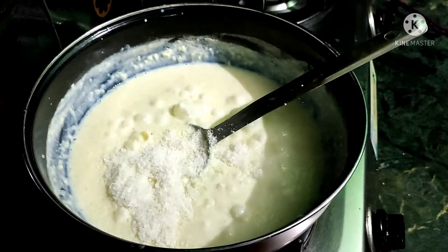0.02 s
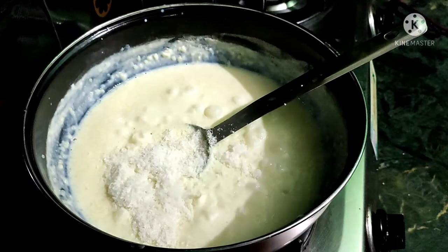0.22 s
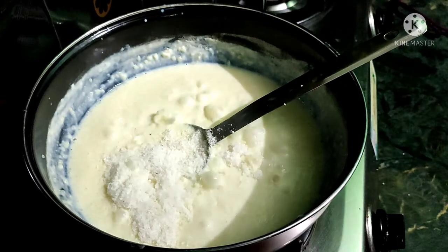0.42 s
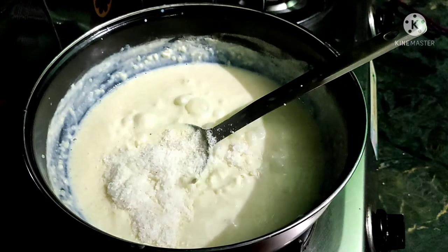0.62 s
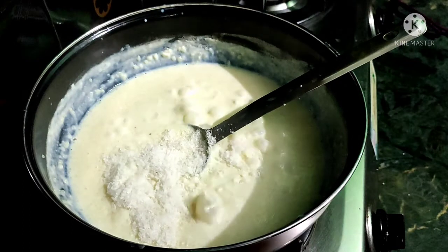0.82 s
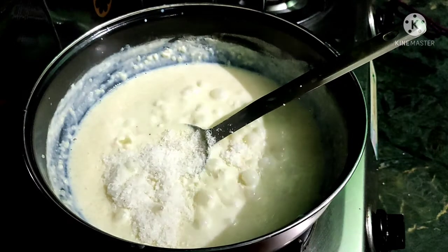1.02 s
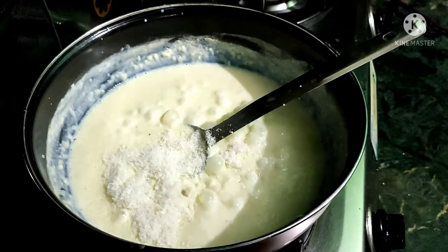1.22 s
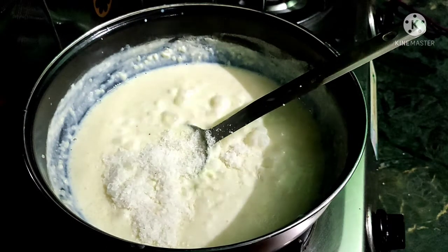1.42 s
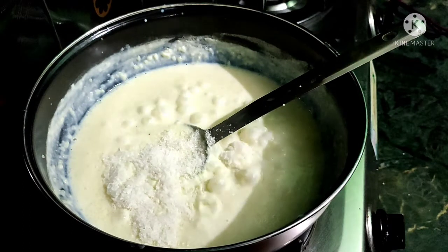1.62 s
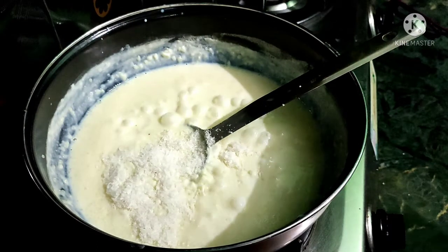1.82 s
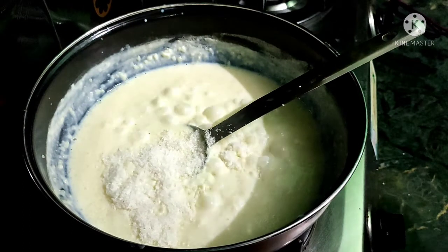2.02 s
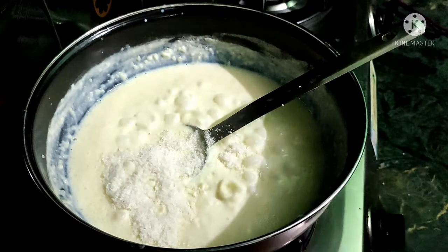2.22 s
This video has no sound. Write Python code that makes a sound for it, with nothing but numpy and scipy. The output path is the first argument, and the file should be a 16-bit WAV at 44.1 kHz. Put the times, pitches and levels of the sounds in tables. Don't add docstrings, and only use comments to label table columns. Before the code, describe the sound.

Steady thick bubbling in a metal pan, heard very close in stereo: dull thumps, wet pops and fine fizz over faint flame hush. Near the start something hard is tapped, rings briefly and fades in the kitchen.

```python
import sys
import numpy as np
from scipy import signal
from scipy.io import wavfile
from scipy.ndimage import uniform_filter1d

SR = 44100
rng = np.random.default_rng(int(sys.argv[2]) if len(sys.argv) > 2 else 0)


def how_loud(loudness_db):
    steps = np.asarray(loudness_db, float) / 20
    return 10 ** steps


def generate_wav(sig):
    pcm = np.round(np.clip(np.atleast_2d(sig).T, -1, 1) * 32767).astype(np.int16)
    wavfile.write(sys.argv[1], SR, pcm)


N = 101429
T = np.arange(N) / SR
SIDES = np.array([[.5], [-.5]])

# [t/s, peak level/dB, length/s]
GULPS = [(0.054, -40.5, 0.036), (0.165, -41, 0.16), (0.395, -40.5, 0.046), (0.558, -55, 0.19),
         (0.62, -32, 0.012), (0.68, -50, 0.019), (0.751, -39.5, 0.034), (0.796, -53, 0.022),
         (0.872, -41.5, 0.015), (0.947, -39.5, 0.057), (1.067, -37.5, 0.026), (1.132, -41.5, 0.0092),
         (1.197, -42, 0.048), (1.297, -47, 0.031), (1.386, -45, 0.079), (1.452, -48.5, 0.033),
         (1.615, -33, 0.017), (1.721, -46, 0.046), (1.748, -44.5, 0.012), (1.845, -47, 0.021),
         (1.905, -38.5, 0.042), (2.011, -46.5, 0.1), (2.1, -39.5, 0.043), (2.228, -43, 0.015)]
# [t/s, peak level/dB, length/s]
HEAVES = [(0.053, -37, 0.028), (0.156, -31.5, 0.098), (0.22, -39, 0.025), (0.24, -39.5, 0.079),
          (0.325, -52, 0.069), (0.392, -41, 0.079), (0.444, -35, 0.019), (0.463, -49, 0.029),
          (0.519, -42, 0.06), (0.63, -41, 0.039), (0.684, -39, 0.027), (0.752, -34.5, 0.029),
          (0.815, -34.5, 0.074), (0.87, -41.5, 0.044), (0.968, -31.5, 0.023), (1.013, -43, 0.051),
          (1.083, -36.5, 0.054), (1.206, -44, 0.078), (1.32, -41, 0.027), (1.394, -38, 0.054),
          (1.526, -43, 0.06), (1.569, -47.5, 0.035), (1.636, -36.5, 0.045), (1.747, -41.5, 0.086),
          (1.844, -44, 0.042), (1.913, -45, 0.097), (2.014, -41, 0.017), (2.05, -38.5, 0.068),
          (2.102, -43, 0.044), (2.128, -37, 0.054), (2.21, -52, 0.035), (2.229, -42, 0.018)]
# [f/Hz, level/dB, t60/s]
PAN_MODES = [(98, -8.5, 0.42), (204.7, -4, 0.22), (265.7, -12, 0.3), (378, -8.5, 0.05), (485, -11, 0.051),
             (604, -9.5, 0.19), (735.6, -14, 0.11), (822, -14, 0.079), (1177, -12, 0.17), (1238, -24, 0.3)]
# [f/Hz, density/dB per Hz]
SEETHE_SPECTRUM = [(35, -56), (60, -54), (92, -25), (204, -6), (678, -8), (1180, -6.5), (5000, -36),
                   (6500, -100), (11000, -120)]
# [f/Hz, density/dB per Hz]
HUSH_SPECTRUM = [(56, -48), (95, -19.5), (207, -4), (609, -14.5), (1030, -30.5), (1170, -19.5), (2510, -20),
                 (5000, -27.5), (12700, -34), (14800, 16)]
# [t/s, level/dB]
STEAM_COURSE = [
    (0.0, -74),
    (1.86, -73.5),
    (2.02, -67.5),
    (2.19, -72.5),
    (2.3, -68.5),
]
# [t/s, level/dB]
DRAUGHT_COURSE = [
    (0.0, -54),
    (0.21, -55.5),
    (0.6, -48.5),
    (1.0, -56),
    (2.3, -56),
]
# [t/s, peak level/dB, f/Hz]
SURFACE_POPS = [(0.63, -38.5, 1135), (0.63, -43.5, 460), (0.648, -43.5, 600), (0.768, -41, 638),
                (0.795, -50, 605), (1.312, -44, 616), (1.69, -45, 616), (0.8, -43.5, 1160),
                (0.887, -34, 1213), (0.981, -50, 1215), (1.202, -55, 1090), (1.228, -47.5, 1270),
                (1.61, -47.5, 1240), (1.69, -46, 1240), (1.904, -46, 1280), (1.929, -45, 1190),
                (2.095, -39.5, 1300), (2.125, -44, 870), (1.132, -30, 1370), (1.392, -46.5, 1280),
                (1.487, -41, 900), (1.636, -43, 1250), (1.872, -37.5, 1260), (2.062, -43, 920),
                (2.156, -35, 1216), (2.249, -35.5, 1354),
                (0.111, -41, 1770), (0.66, -55, 1650), (1.023, -43, 1694), (1.278, -48, 3300),
              (1.312, -54, 3330), (1.334, -52, 1960), (1.694, -65, 3400), (1.9045, -40.5, 2720),
              (2.064, -42, 1620), (0.6965, -40.5, 1630), (0.7618, -43, 2000), (0.8062, -39.5, 1790),
              (0.9554, -35, 1734), (0.981, -41.5, 1920), (1.041, -38.5, 2050), (1.0547, -46, 2700),
              (1.2292, -40, 1840), (1.41, -44, 2240), (1.4432, -43.5, 2050), (1.5004, -44, 2760),
              (1.5778, -49, 1840), (1.6082, -41.5, 2000), (1.7856, -42.5, 2110), (1.9045, -39.5, 1870),
              (1.9515, -42, 2130), (2.022, -39.5, 1660), (2.0957, -38, 2400), (2.2476, -42.5, 1700)]
# [f/Hz, level/dB, t60/s]
TAP_MODES = [(606, -11, .25), (1335, -7.5, .3), (1413, -2.5, .3), (1471, -8, .3), (1537, -8, .4),
             (1895, -15, .45), (2008, -11, .55), (2052, -12, .55), (2370, -10, .35), (2736, -13, .4),
             (3096, -13, .35), (3444, -13, .35), (3553, -13, .3)]
# [f/Hz, level/dB, t60/s]
TAP_CONTACT = [(1440, -3, .035), (2330, -9, .05), (2830, -11, .06), (3800, -12, .04), (7650, -24, .05),
               (12300, -29, .07)]
# [f/Hz, density/dB per Hz]
TAP_SPECTRUM = [(88, -36), (150, -8.5), (1060, -13), (1370, -5), (4490, -18.5), (12400, -50.5),
                (14800, -54)]
# [f/Hz, left-right level/dB]
TAP_LEAN = [(60, 0), (370, -0.5), (2310, -0.5), (14300, -2)]
# [f/Hz, t60/s]
TAP_DECAY = [(150, 0.063), (400, 0.34), (1040, 0.41), (2760, 0.33), (7280, 0.21)]
# [t/s, peak level/dB, decay/s]
SPITS = [(0.5168, -48, 0.029), (0.564, -41, 0.02), (0.675, -53, 0.046), (0.863, -50, 0.025),
         (0.933, -48.5, 0.07), (1.026, -51.5, 0.031), (1.411, -49, 0.019), (1.7355, -50.5, 0.052),
         (1.0776, -48, 0.059), (1.197, -45, 0.017), (1.281, -47.5, 0.085), (1.4516, -43, 0.049),
         (1.819, -47.5, 0.019), (1.859, -50, 0.054), (1.9041, -52.5, 0.084), (1.964, -49.5, 0.075),
         (2.021, -51.5, 0.081), (2.1, -49.5, 0.073), (2.1233, -49.5, 0.028), (2.243, -44, 0.023)]
# [f/Hz, density/dB per Hz]
SPIT_SPECTRUM = [(1470, -17), (2500, -11.5), (3390, 1), (4330, -6.5), (7340, -12), (14800, -28)]
# [t/s, peak level/dB, f/Hz of the ring]
SNAPS = [
    (0.573, -46.5, 7600),
    (0.9322, -40.5, 7040),
    (1.968, -46, 6050),
    (1.0817, -40, 6730),
    (1.1994, -44, 6850),
    (1.8166, -38, 7540),
    (2.124, -39.5, 7720),
]
# [f/Hz, correlation]
LIKENESS = [(60, .97), (240, .98), (900, .6), (3600, .35), (14000, .3)]
# [f/Hz, left-right level/dB]
LEAN = [(60, 0), (240, 3), (930, 3.5), (3640, 0), (14300, -1.5)]

GULP_DB, PAN_REST_DB, GULP_RELEASE_S = -12, -59.5, 0.017
HEAVE_DB, HEAVE_REST_DB, HEAVE_RELEASE_S = -7.5, -52.5, 0.0092
DEEP_BELOW_HZ = 320
TAP_S, TAP_DB, TAP_CRACK_DB, TAP_WASH_DB, TAP_ROOM_DB = .2132, -22, -29.5, -26.5, -27
TAP_LAG = 2.5
DAMPED_S, DAMPED_DB = .038, -11
CHIME_HZ, CHIME_DB, CHIME_T60_S, CHIME_SWELL_S = 4505, -36, .5, .009
CHIME_LEAN_DB, CHIME_DAMPED_DB = -12, -12
LATE_DB, LATE_STRETCH = -17, 3
KITCHEN_T60_S, KITCHEN_DB, WALL_CUT_HZ = 0.48, -13.5, 4000


def rms_one(x):
    return x / np.sqrt(np.mean(x ** 2) + 1e-20)


def at_hz(points, hz):
    return np.interp(np.log(hz), np.log(np.array(points)[:, 0]), np.array(points)[:, 1])


def filtered(x, order, cut_hz, kind):
    return signal.sosfilt(signal.butter(order, cut_hz, kind, fs=SR, output="sos"), x)


def drift(rate):
    r = np.exp(-80 * np.pi * rate / SR)
    noise = rng.standard_normal(N // 40 + 2002)
    slow = signal.lfilter([1], [1, -2 * r, r * r], noise)[2000:]
    return np.interp(np.arange(N) / 40, np.arange(len(slow)), rms_one(slow))


def ring(clicks, hz, t60):
    r, w = how_loud(-60 / (t60 * SR)), 2 * np.pi * hz / SR
    return signal.lfilter([0, np.sin(w)], [1, -2 * r * np.cos(w), r * r], clicks + 1e-18)


def grains(rate, spread_db):
    sizes = how_loud(spread_db * np.minimum(rng.exponential(1, N), 5)) * rng.choice([-1, 1], N)
    return sizes * (rng.random(N) < rate / SR)


def alike_ports(hz):
    return at_hz(LIKENESS, hz)


def bands(spectrum, shape, alike, lean):
    out, power, edges = 0, 0, 56 * 2 ** np.arange(0, 8.2, 1 / 3)
    white = rng.standard_normal((2, 2, N))
    for k, (low, high) in enumerate(zip(edges, edges[1:])):
        hz = np.sqrt(low * high)
        if not spectrum[0][0] <= hz <= spectrum[-1][0]:
            continue
        mid, side = filtered(white[k % 2], 2, [low, high], "band")
        c = np.clip(alike(hz), 0, 1)
        gain = how_loud(at_hz(spectrum, hz))
        power += gain ** 2 * np.mean(mid ** 2)
        pair = np.sqrt(1 + c) * mid + np.sqrt(1 - c) * side * 2 * SIDES
        out = out + gain * shape(hz) * how_loud(SIDES * at_hz(lean, hz)) * pair
    return out / np.sqrt(2 * power)


def vigour(rows, gain_db, rest_db, release):
    out = np.full(N, how_loud(rest_db))
    for s, db, hold in rows:
        up = np.clip((T - s) / 0.0028 + .5, 0, 1)
        out += how_loud(db + gain_db) * up * np.exp(-np.maximum(T - s - hold, 0) / release)
    return out


def pan(boil, deep):
    thumps = rms_one(signal.lfilter([.2], [1, -.8], grains(900, spread_db=1.5)))
    out = np.zeros((2, N))
    for hz, db, t60 in PAN_MODES:
        t60 = min(t60, .17)
        drive = thumps * (1 if hz < DEEP_BELOW_HZ else boil)
        signs = rng.choice([-1, 1], N // 32 + 1).repeat(32)[:N]
        hit = ring(drive * signs, hz, t60) / np.sqrt(t60 * SR / 14)
        if hz < DEEP_BELOW_HZ:
            even = hit / np.sqrt(uniform_filter1d(hit ** 2, SR // 25) + .05)
            hit = even * (deep.mean() if hz < 150 else uniform_filter1d(deep, SR // 50))
        out += how_loud(db + SIDES * at_hz(LEAN, hz)) * hit
    return how_loud(-8.5) * filtered(out, 2, 85, "high")


def seethe(boil, deep):
    def churn(hz):
        return (deep if hz < DEEP_BELOW_HZ else boil) * how_loud(1.76 * drift(24.6))
    return how_loud(-9.5) * bands(SEETHE_SPECTRUM, churn, alike_ports, LEAN)


def fizz(boil):
    clicks = grains(200 * boil / boil.mean(), spread_db=1.2)
    dealt = rng.integers(0, 16, N)
    out = np.zeros((2, N))
    for k, hz in enumerate(np.geomspace(1400, 5000, 16)):
        level = SIDES * rng.normal(2, 3) - 6.0 * np.log2(hz / 900)
        out += how_loud(level) * ring(clicks * (dealt == k), hz, 16 / hz)
    return how_loud(-67.5) * rms_one(out)


def hush():
    steam_db = np.interp(T, *np.transpose(STEAM_COURSE))
    swing_db = steam_db - steam_db.mean()

    def breath(hz):
        return how_loud(swing_db * min(hz / 9000, 1.3) + drift(14))
    return how_loud(-61) * bands(HUSH_SPECTRUM, breath, alike_ports, LEAN)


def draught():
    s, db = np.transpose(DRAUGHT_COURSE)
    noise = rng.standard_normal((2, N + SR))
    slow = filtered(noise, 3, [9, 20.7 * 1.31], "band")[:, SR:]
    return how_loud(np.interp(T, s, db)) * rms_one(slow[0] + .5 * slow[1] * SIDES)


def pops():
    cycles_to_60_db, rise, splash_s = 32, .04, .006
    out = np.zeros((2, N + SR))
    t = np.arange(SR // 10) / SR
    for s, db, hz in SURFACE_POPS:
        cycles = hz * t
        wave = np.sin(2 * np.pi * cycles * (1 - rise + rise * cycles / cycles_to_60_db))
        rough_db = 1.5 * np.interp(t * 600, np.arange(61), rng.standard_normal(61))
        wave = wave * how_loud(rough_db - 60 * cycles / 32) * (1 - np.exp(-1.5 * cycles)) ** 2
        splash = 3 * rng.standard_normal((2, len(t))) * np.exp(-t / splash_s)
        wave = wave + how_loud(-19) * filtered(splash, 3, [700, 2200 * 1.3], "band")
        i = int(s * SR)
        lean_db = 8 * np.log2(hz / 1100)
        out[:, i:i + len(t)] += how_loud(db - 1.5 + SIDES * lean_db) * wave
    out = out[:, :N]
    return out + how_loud(-53.5) * ring(out, 1160, 0.077)


def kitchen(x):
    out, dull = np.zeros((2, N)), np.exp(-2 * np.pi * WALL_CUT_HZ / SR)
    for k, lag in enumerate((rng.uniform(.008, .03, 16) * SR).astype(int)):
        loop, gain, state = x.copy(), how_loud(-60 * lag / SR / KITCHEN_T60_S), [0.]
        for i in range(lag, N, lag):
            back, state = signal.lfilter([gain * (1 - dull)], [1, -dull], loop[i - lag:i], zi=state)
            loop[i:i + lag] += back[:N - i]
        out[k % 2] += (loop - x) * (-1) ** (k // 2)
    return out


def tap():
    after = np.maximum(T - TAP_S, 0)
    on = np.clip(after / .0006, 0, 1)
    damped = np.clip((after - DAMPED_S) / .018, 0, 1)
    modes = np.zeros((2, N))
    for hz, db, t60 in [*TAP_MODES, *TAP_CONTACT]:
        phase = rng.normal(0, .15) + 2 * np.pi * hz * TAP_LAG / SR * SIDES
        level = db + TAP_DB + DAMPED_DB * damped * (hz < 1500) - 60 * after / t60
        modes += how_loud(level) * np.sin(2 * np.pi * hz * after + phase) * on
    chime = np.sin(2 * np.pi * CHIME_HZ * T) * 2 * SIDES * (1 - np.exp(-after / CHIME_SWELL_S))
    chime_db = CHIME_DB + SIDES * CHIME_LEAN_DB + CHIME_DAMPED_DB * damped - 60 * after / CHIME_T60_S
    modes += how_loud(chime_db) * chime

    def dying(hz):
        fall = -60 * after / at_hz(TAP_DECAY, hz)
        crack = how_loud(TAP_CRACK_DB - 60 * after / 0.021)
        late = how_loud(TAP_WASH_DB + LATE_DB + fall / LATE_STRETCH)
        return on * (crack + how_loud(TAP_WASH_DB + fall) + late)
    wash = bands(TAP_SPECTRUM, dying, lambda hz: 150 / hz + 0.035, TAP_LEAN)
    return modes + how_loud(TAP_ROOM_DB) * kitchen(modes[0]) + wash


def spits():
    gate = np.zeros(N)
    for s, db, decay in SPITS:
        start = np.clip((T - s) / 0.0027 + .5, 0, 1)
        gate += how_loud(db - 10) * start * how_loud(-20 * np.abs(T - s) / max(decay, .002))
    return bands(SPIT_SPECTRUM, lambda hz: gate * how_loud(0.34 * drift(90)), lambda hz: .6, LEAN)


def snaps():
    out, t = np.zeros((2, N + SR)), np.arange(SR // 20) / SR
    for s, db, hz in SNAPS:
        burst = rng.standard_normal((2, len(t))) * np.exp(-t / .0012)
        click = filtered(burst, 2, [4500, 12000], "band")
        i = int(s * SR)
        out[:, i:i + len(t)] += how_loud(db - 7) * (click + 0.25 * ring(burst, hz, .008))
    return out[:, :N]


def scene():
    boil = vigour(GULPS, GULP_DB, PAN_REST_DB, GULP_RELEASE_S)
    deep = vigour(HEAVES, HEAVE_DB, HEAVE_REST_DB, HEAVE_RELEASE_S)
    milk = pan(boil, deep) + seethe(boil, deep) + fizz(boil) + pops() + spits() + snaps()
    echo = how_loud(KITCHEN_DB) * kitchen(filtered(milk.mean(axis=0), 2, 400, "high"))
    return milk + echo + hush() + draught() + tap()


def top_cut(x):
    return signal.sosfilt(signal.butter(12, 14300, fs=SR, output="sos"), x)


def record(dry):
    lag = 5
    right = np.concatenate([dry[1, :lag], dry[1, :-lag]])
    return top_cut(np.array([dry[0], right]))


dry = scene()
out = record(dry)
generate_wav(out)
```